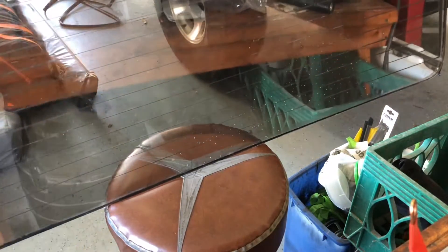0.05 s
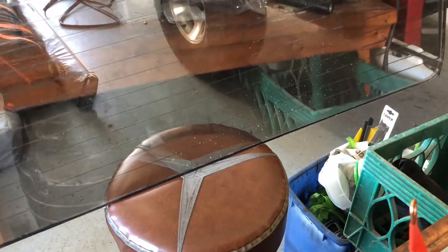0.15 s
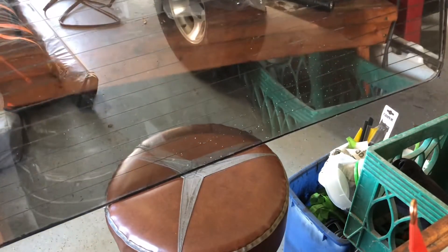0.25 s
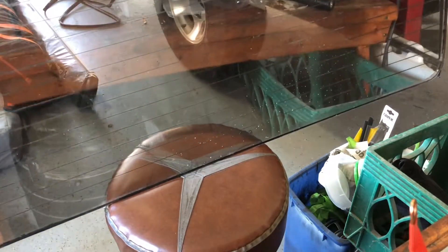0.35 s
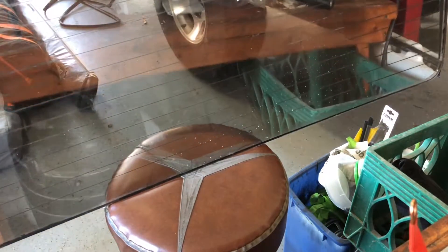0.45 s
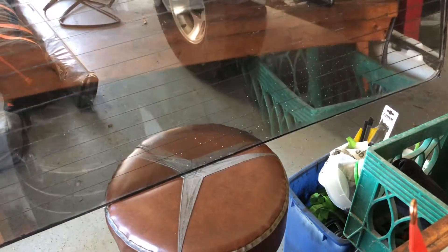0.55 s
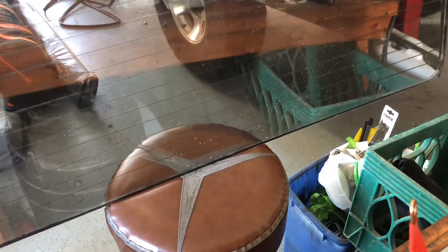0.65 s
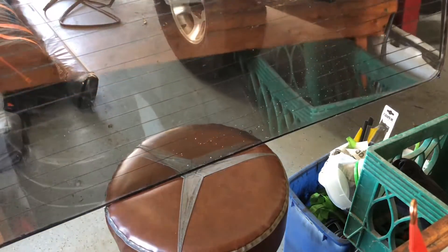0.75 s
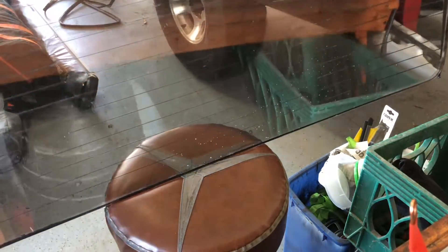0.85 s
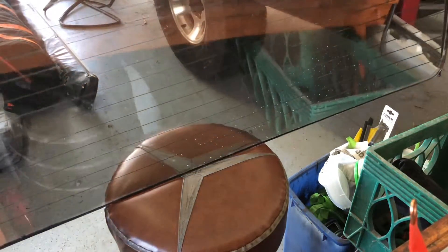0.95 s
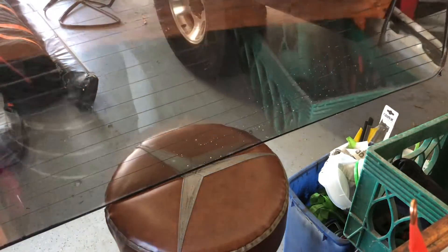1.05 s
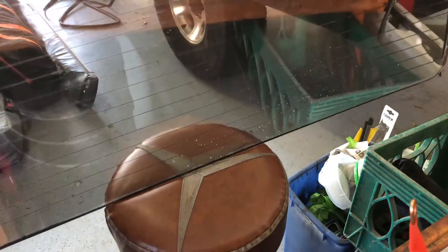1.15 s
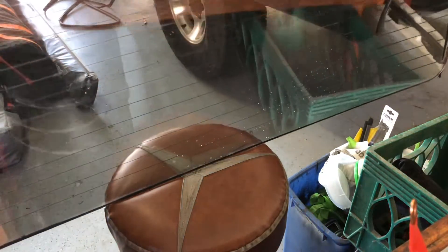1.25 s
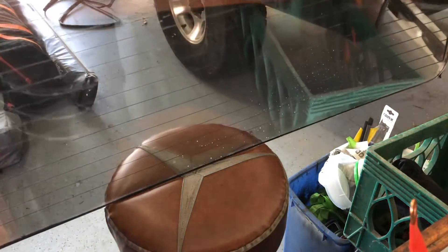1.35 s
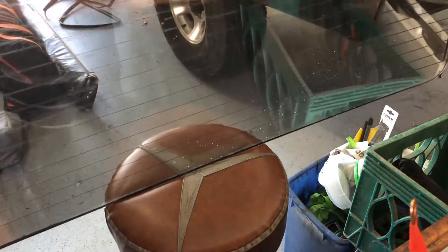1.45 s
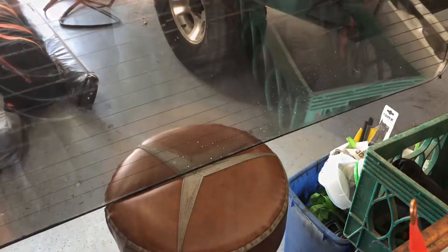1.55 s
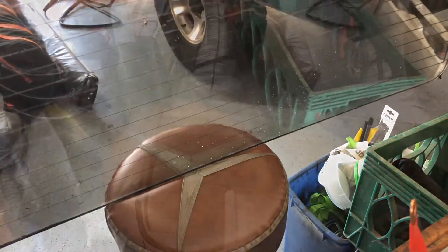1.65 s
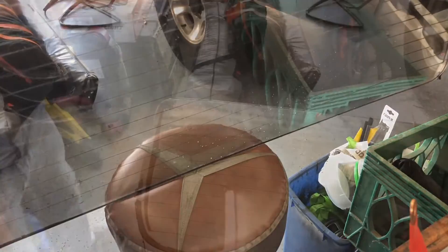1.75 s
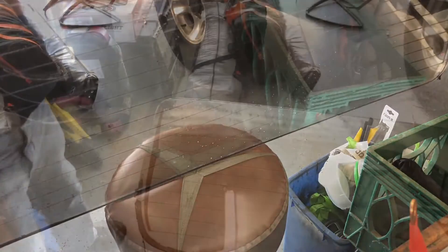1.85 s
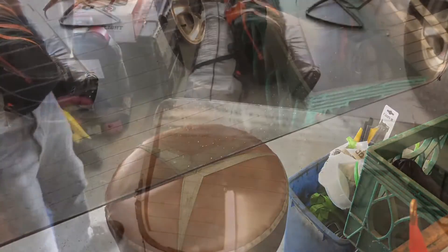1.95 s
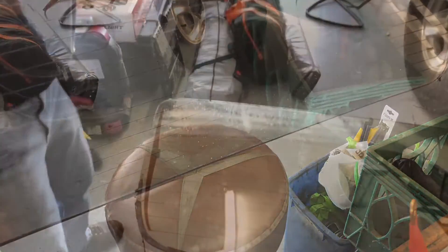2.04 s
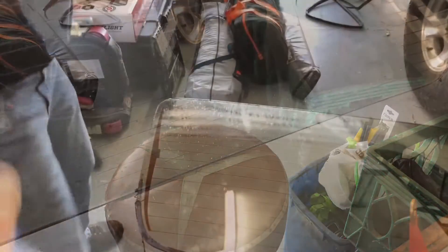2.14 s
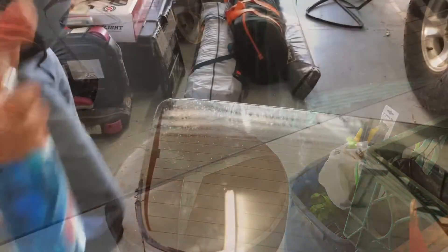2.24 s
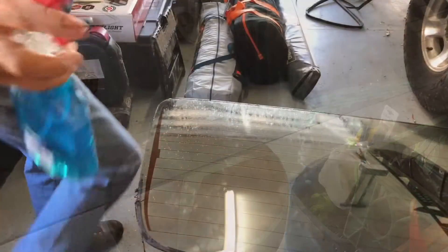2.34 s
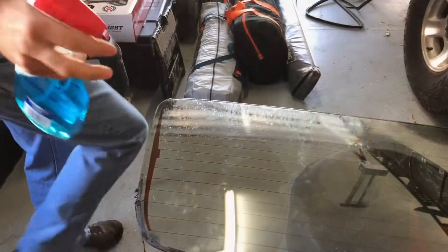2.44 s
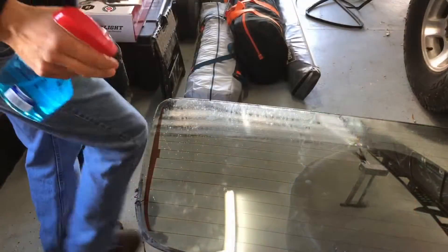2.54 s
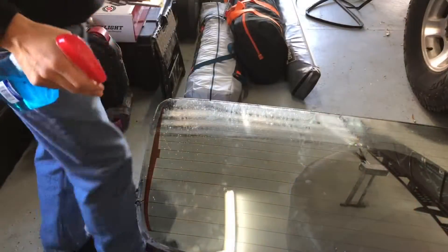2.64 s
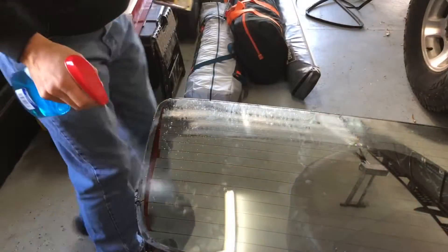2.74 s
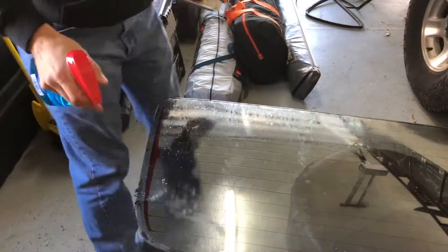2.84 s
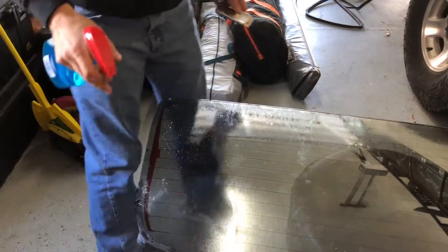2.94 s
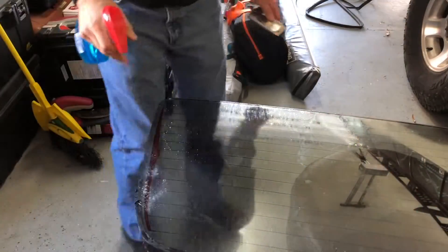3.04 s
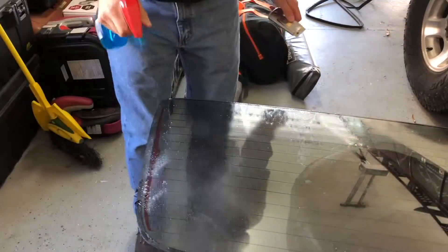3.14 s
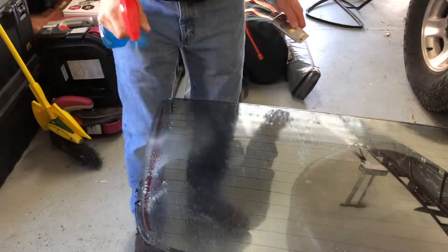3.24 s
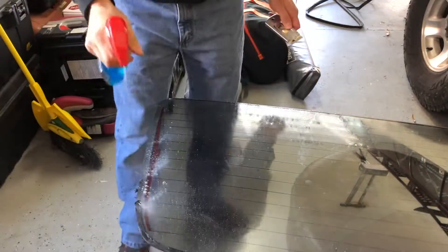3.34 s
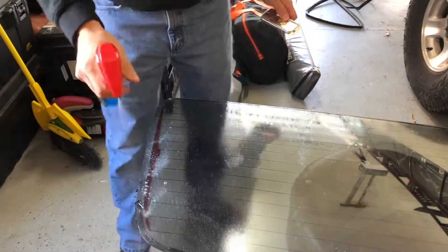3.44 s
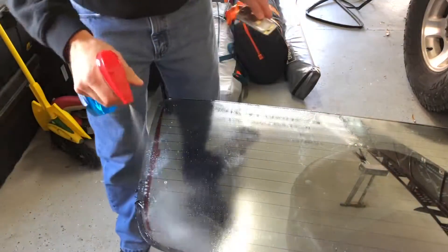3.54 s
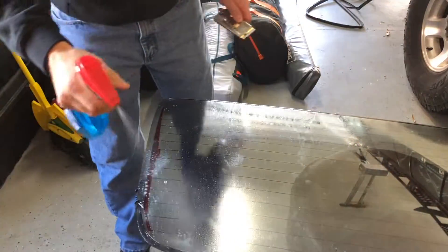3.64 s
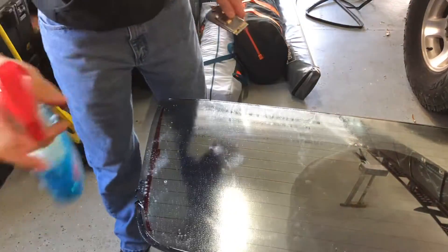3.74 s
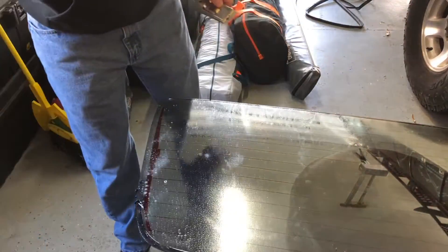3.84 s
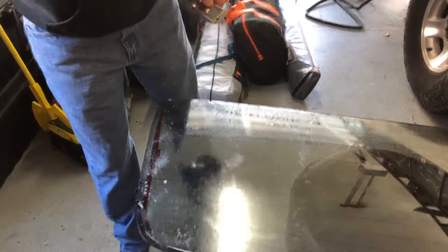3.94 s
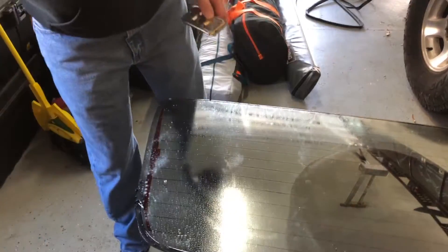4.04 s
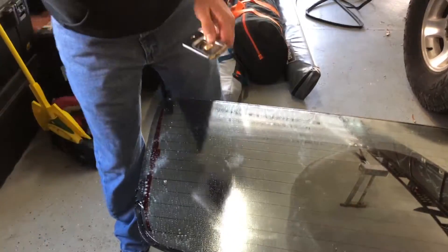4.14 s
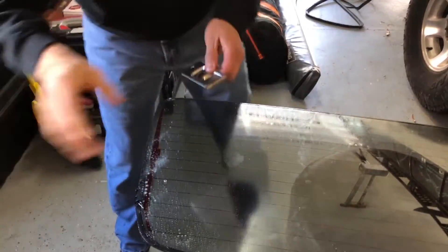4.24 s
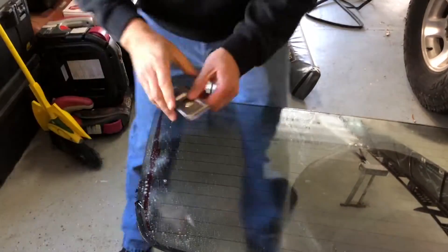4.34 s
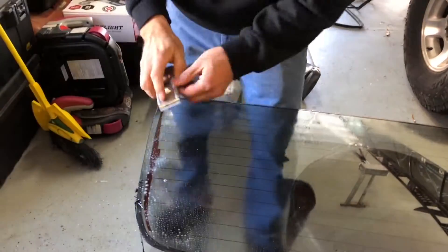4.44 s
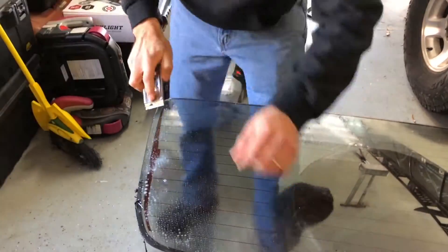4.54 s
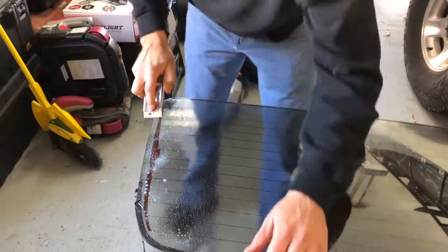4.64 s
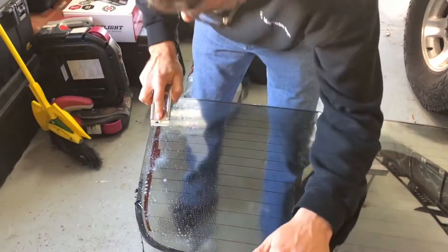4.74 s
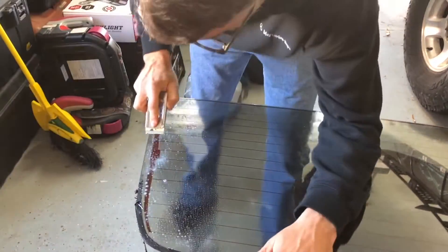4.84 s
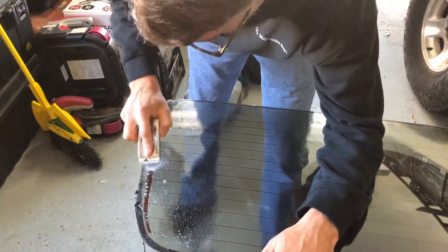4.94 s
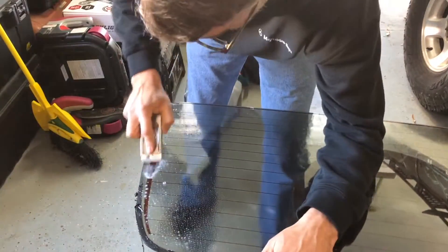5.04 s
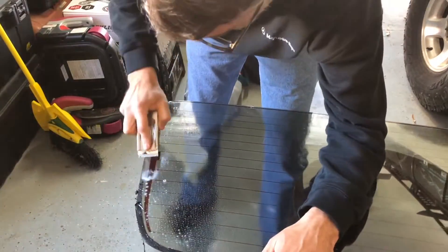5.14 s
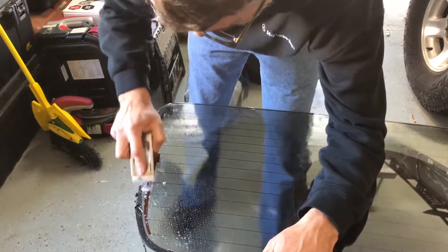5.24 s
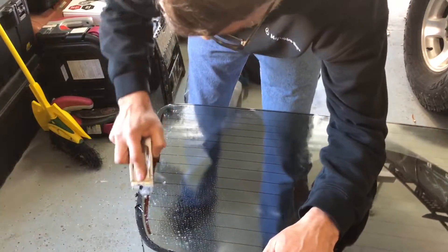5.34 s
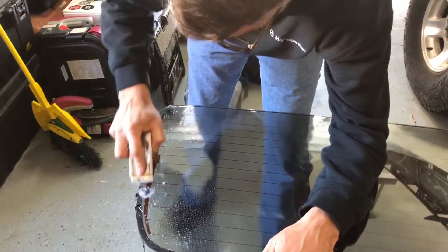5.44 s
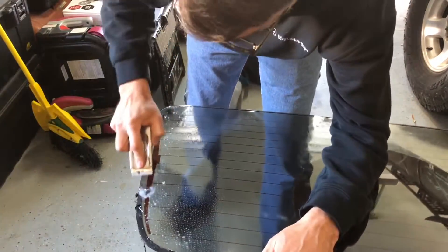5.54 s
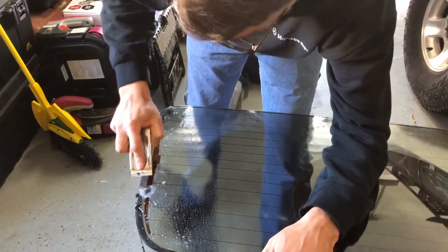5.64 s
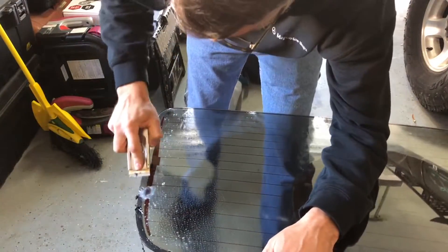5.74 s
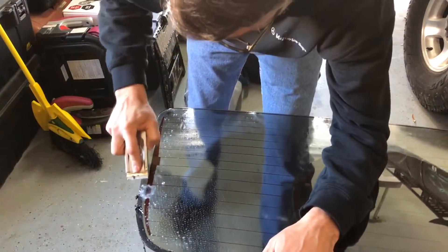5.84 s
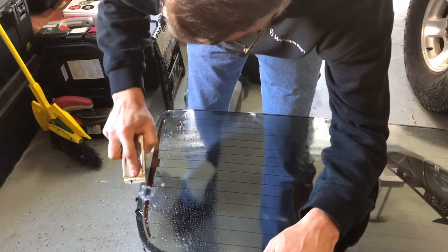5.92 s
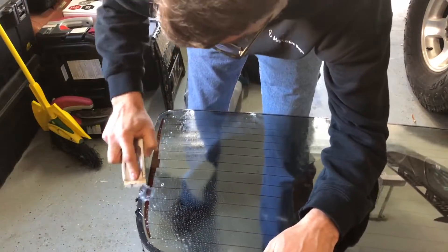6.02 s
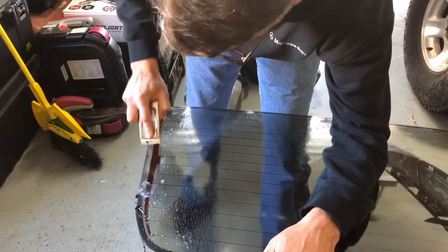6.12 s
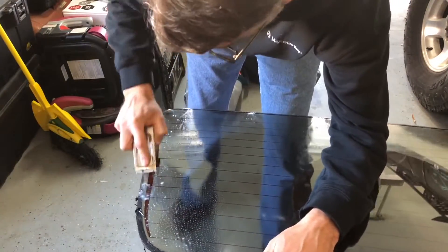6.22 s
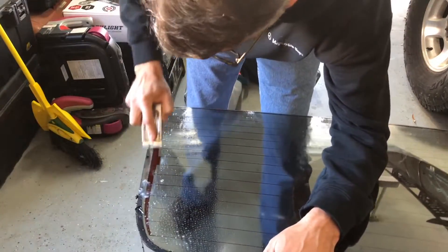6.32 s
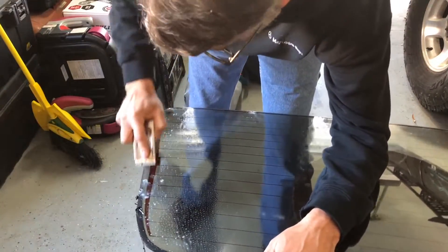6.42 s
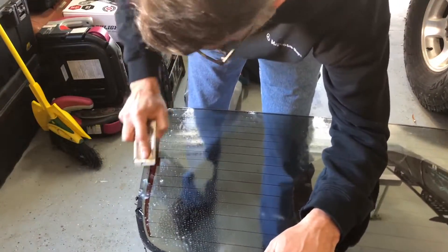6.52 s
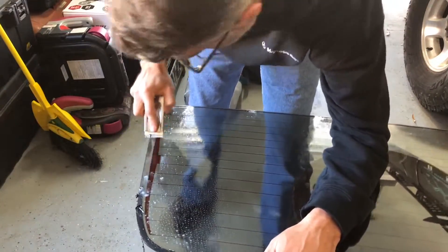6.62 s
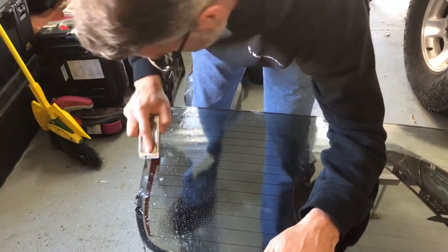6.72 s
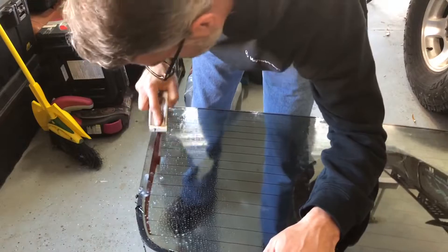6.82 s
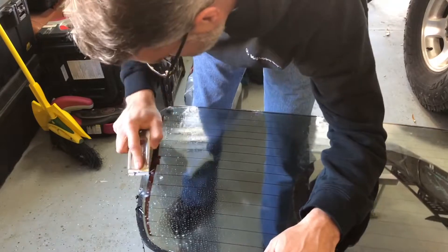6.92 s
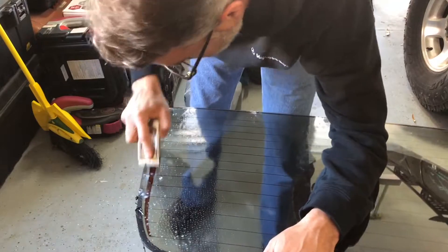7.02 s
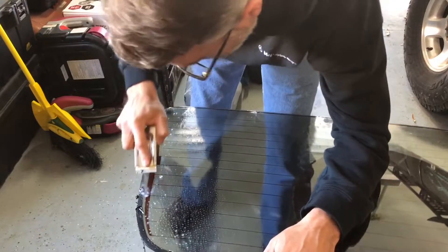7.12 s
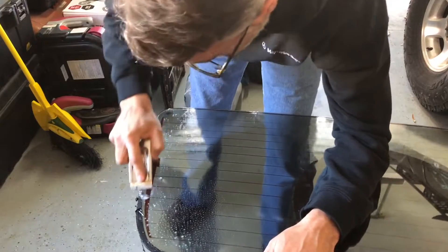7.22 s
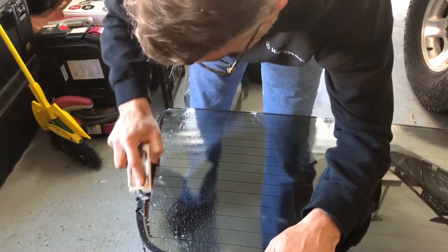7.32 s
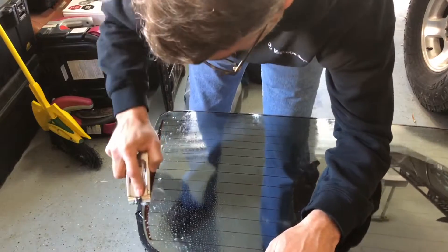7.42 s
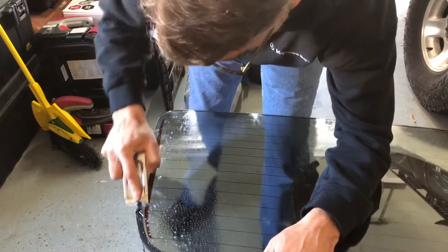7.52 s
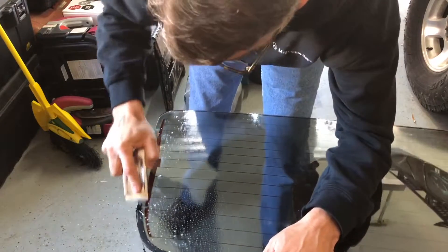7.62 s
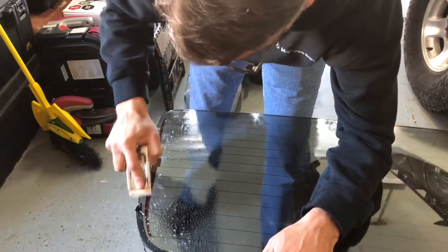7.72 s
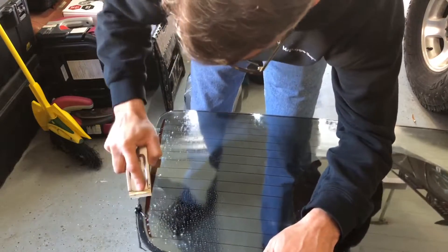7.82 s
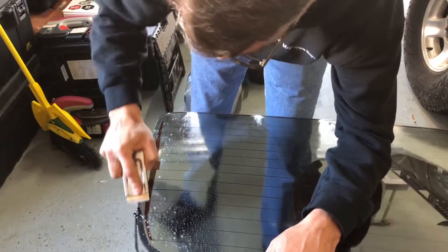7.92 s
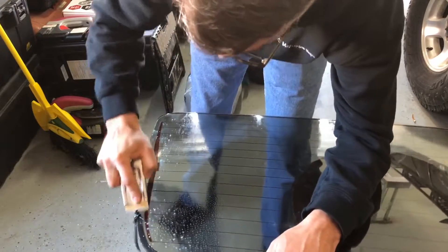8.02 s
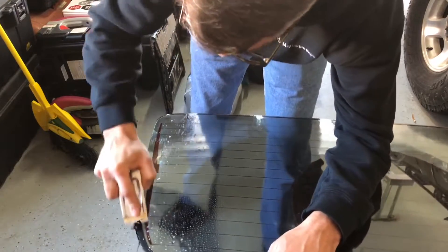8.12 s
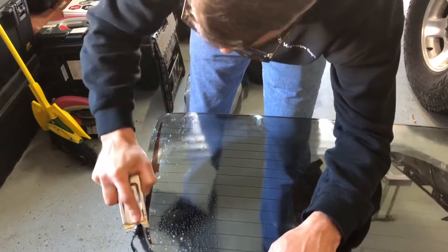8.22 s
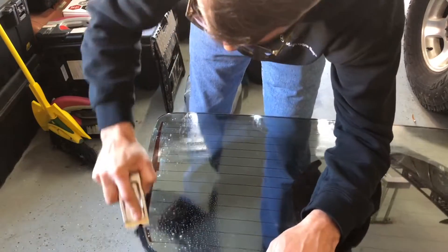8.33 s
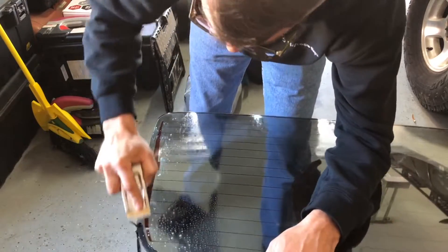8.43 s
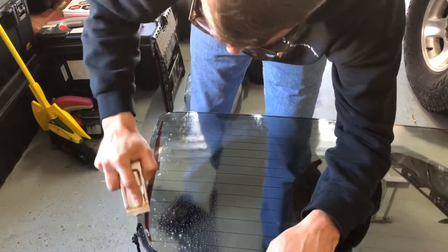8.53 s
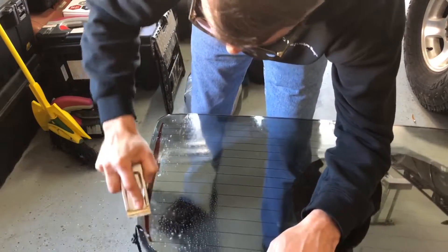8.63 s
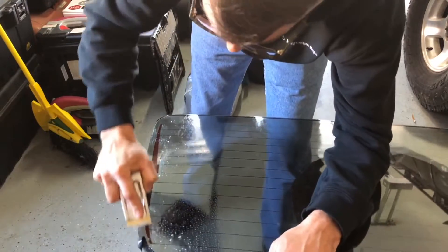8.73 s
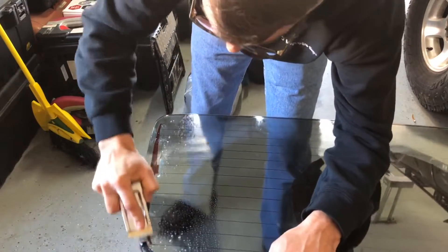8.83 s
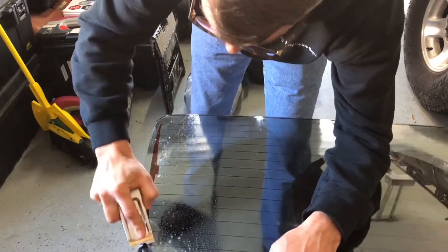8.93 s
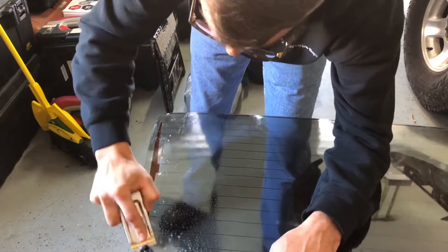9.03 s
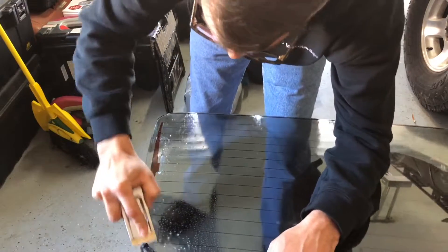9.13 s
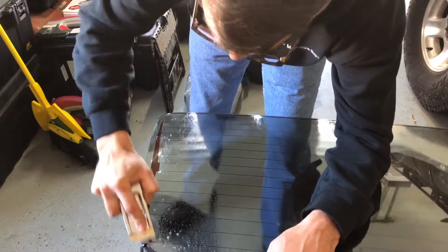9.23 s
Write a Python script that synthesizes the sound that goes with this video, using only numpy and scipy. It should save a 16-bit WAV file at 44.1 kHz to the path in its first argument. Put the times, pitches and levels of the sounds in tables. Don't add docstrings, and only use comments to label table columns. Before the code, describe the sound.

A workshop's low hum and hiss sinks away while cloth and plastic rustle and something small clinks. An abrupt cut brings a quieter garage: eight quick trigger-sprayer squirts, then a plastic bottle lands and rocks on its rim. A razor blade then scrapes wet glass in fast back-and-forth strokes, settling into a steady shuttle with a knock on each push. Close microphone, short dry room tail.

```python
import sys
import numpy as np
from scipy import signal
from scipy.fft import rfft, irfft, next_fast_len
from scipy.io import wavfile
from scipy.ndimage import uniform_filter1d

SR = 44100
rng = np.random.default_rng(int(sys.argv[2]) if len(sys.argv) > 2 else 0)


def master(y):
    cut = np.clip(np.atleast_2d(y).T, -1, 1)
    pcm = np.round(cut * 32767)
    wavfile.write(sys.argv[1], SR, pcm.astype(np.int16))


def convert_level_to_amplitude(level_db):
    exponent = np.asarray(level_db, float) / 20
    return 10 ** exponent


N = 408807
T = np.arange(N) / SR
LOOP = 2 ** 17
CUT_S = 2.683


def evened(x):
    return x / np.sqrt(np.mean(x ** 2) + 1e-20)


def curve(t, points):
    return np.interp(t, *np.transpose(points))


def coloured(x, points):
    size = next_fast_len(len(x))
    f, level_db = np.transpose(points)
    hz = np.fft.rfftfreq(size, 1 / SR)
    gain = convert_level_to_amplitude(np.interp(np.log(hz + 1), np.log(f + 1), level_db))
    return evened(irfft(rfft(x, size) * gain, size)[:len(x)])


def grit(per_s, spread_db, size=N):
    large = np.minimum(rng.exponential(1, size), 4) * (rng.random(size) < per_s / SR)
    return rng.standard_normal(size) * convert_level_to_amplitude(spread_db * large)


def texture(points, per_s=0, spread_db=0):
    return np.resize(coloured(grit(per_s, spread_db, LOOP), points), N)


def drift(t, per_s, spread_db):
    steps = rng.standard_normal(300)
    return np.interp(t * per_s, np.arange(len(steps)), convert_level_to_amplitude(spread_db * steps))


def resonate(x, hz, width):
    r = np.exp(-np.pi * width / SR)
    zeros = (1 - r ** 2) / 2 * np.array([1, 0, -1])
    poles = [1, -(1 + r ** 2) * np.cos(2 * np.pi * hz / SR), r ** 2]
    return signal.lfilter(zeros, poles, x)


def slide(x, hz, width):
    turn = np.exp(2j * np.pi * np.cumsum(hz) / SR)
    r = np.exp(-np.pi * width / SR)
    return 2 * (turn * signal.lfilter([1 - r], [1, -r], x * turn.conj())).real


def flecked(x, fine_db, broad_db):
    z = signal.stft(x, nperseg=512, noverlap=384)[2]
    fine, broad = rng.standard_normal((z.shape[1], z.shape[0], 2)).T
    fine = evened(uniform_filter1d(uniform_filter1d(fine, size=2, axis=0), size=7, axis=1))
    broad = evened(uniform_filter1d(uniform_filter1d(broad, size=20, axis=0), size=10, axis=1))
    z = z * convert_level_to_amplitude(fine_db * fine + broad_db * broad)
    return evened(signal.istft(z, nperseg=512, noverlap=384)[1][:len(x)])


def bumps(s, db, rise, t60):
    out = np.zeros(N)
    for at, gain, up, down in np.broadcast(s, convert_level_to_amplitude(db), rise, t60):
        near = slice(max(int((at - 3 * up) * SR), 0), int((at + down) * SR))
        u = T[near] - at
        out[near] += gain * np.where(u < 0, np.exp(-2 * (u / up) ** 2), convert_level_to_amplitude(-60 * np.maximum(u, 0) / down))
    return out


def bursts(noise, s, db, rise, t60):
    out, u = np.zeros(N), T[:SR // 50] - .003
    shape = np.where(u < 0, np.exp(-2 * (u / rise) ** 2), convert_level_to_amplitude(-60 * np.maximum(u, 0) / t60))
    for at, gain in zip(s, convert_level_to_amplitude(db)):
        start = int((at - .003) * SR)
        burst = shape * noise[start:start + len(u)]
        out[start:start + len(u)] += gain * burst / abs(burst).max()
    return out


def ring(s, db, modes, push, pitch=0.98, vary_db=4.5, detune=0.0033):
    out, t = np.zeros(N + SR), T[:SR // 6]
    hz, mode_db, t60 = np.transpose(modes)[:, :, None]
    for at, gain, k in np.broadcast(s, convert_level_to_amplitude(db), pitch):
        chance = rng.standard_normal((2, len(hz), 1))
        share = convert_level_to_amplitude(mode_db + vary_db * chance[0] - 60 * t / t60)
        sound = (share * np.sin(2 * np.pi * k * hz * (1 + detune * chance[1]) * t)).sum(0)
        blow = rng.standard_normal(len(t)) * convert_level_to_amplitude(-60 * t / push)
        sound = signal.fftconvolve(sound, blow)[:len(t)]
        out[int(at * SR):][:len(t)] += gain * sound / abs(sound).max()
    return out[:N]


# f/Hz, level/dB
HUM_LINES = [(62.4, -51.5), (119.7, -51), (239.7, -63.5)]
# f/Hz, level/dB
RUMBLE = [(15, -59), (25, -21), (54, 2), (123, -1), (140, -0.5), (216, -13.5), (260, -13), (340, -19),
          (570, -120)]
WASH = [(88, -49), (150, -3), (264, -13), (358, -8), (475, -9.5), (789, -7.5), (2500, -26), (3250, -61),
        (5500, -120)]
HISS = [(880, -7), (1500, -5), (2100, -12.5), (2720, -10), (3280, -8), (4160, -11.5), (7030, -6.5),
        (8000, 4), (8830, -9.5), (9470, -8), (10200, -16), (11000, -5.5), (16000, -23)]
# t/s, level/dB
HUM_FADE = [(0, -1), (.9, -1), (1.5, -4.5), (2.03, -10), (2.35, -14.5), (2.6, -20.5)]


def shop():
    fade = convert_level_to_amplitude(curve(T, HUM_FADE))
    second_hiss = convert_level_to_amplitude(-56) * np.clip((T - 2.034) / .06 + .5, 0, 1)
    lines = 0
    for hz, db in HUM_LINES:
        level = convert_level_to_amplitude(db) * drift(T, 8.03, 1.6)
        lines = lines + level * np.sin(2 * np.pi * hz * np.cumsum(drift(T, 4.98, 0.092)) / SR)
    hum = evened(evened(lines) + convert_level_to_amplitude(-4.0) * texture(RUMBLE))
    hiss = texture(HISS, 280, 3.5)
    hiss = np.r_[flecked(hiss[:LOOP], 1.6, 1.3), hiss[LOOP:]]
    whine = 1.1 * resonate(hiss, 3297, 43)
    hiss = (hiss + whine) * drift(T, 7.9, 0.82)
    sound = convert_level_to_amplitude(-45.5) * fade * hum + convert_level_to_amplitude(-59) * texture(WASH) + np.hypot(convert_level_to_amplitude(-56) * fade, second_hiss) * hiss
    return sound * np.clip((CUT_S - T) / 0.00091, 0, 1)


# t/s, peak level/dB, swell/s, fade/s, centre f/Hz
RUSTLES = [(.07, -49, 0.013, 0.033, 8000), (.23, -57.5, 0.039, 0.079, 4500), (.62, -54, 0.037, 0.043, 5000),
           (0.887, -46.5, 0.0024, 0.023, 430), (.933, -48.5, 0.0011, 0.0055, 4000),
           (1.004, -48, 0.019, 0.14, 4450), (1.025, -51, 0.014, 0.05, 7750),
           (1.27, -51.5, 0.045, 0.084, 9900), (.89, -50.5, .006, 0.011, 6500), (.785, -56, .01, .02, 8000),
           (1.983, -48, 0.0032, 0.011, 7000), (1.995, -47.5, 0.004, 0.013, 3500),
           (2.098, -50, 0.00085, 0.0026, 6000), (2.127, -50, 0.0018, .006, 1500),
           (2.166, -46.5, .0012, 0.0045, 2500), (2.041, -49, .002, 0.0092, 10000),
           (2.051, -34.5, 0.0018, 0.0081, 6900), (2.098, -51, 0.033, 0.035, 6000),
           (2.054, -40.5, 0.001, 0.0065, 1500), (2.165, -49, 0.021, 0.019, 5000),
           (2.27, -52, 0.053, 0.13, 4080), (2.85, -54, 0.022, 0.074, 12100),
           (4.545, -52.5, 0.016, 0.085, 11800), (4.813, -58, 0.001, 0.0036, 10000)]
# peak level/dB, f/Hz, swell/s, t60/s
FOOTFALL = (-33.5, 84, .022, .3)
# f/Hz, level/dB, t60/s
CLINK_MODES = [(2240, 8, 0.045), (2400, 5, 0.041), (3400, -3, 0.075), (5540, 2, 0.058), (4190, -9, 0.024),
               (6170, -4, .1), (3200, -4, 0.23)]


def rustles():
    noise = .5 * texture(HISS, 900, 2.0) + 0.8 * texture([(1500, -2.5), (16000, -3.0)], 1100, 2.5)
    noise = np.resize(flecked(noise[:LOOP], 3.5, 2.5), N)
    out = np.zeros(N)
    for s, db, rise, t60, hz in RUSTLES:
        near = slice(max(int((s - .15) * SR), 0), int((s + 1.5) * SR))
        band = resonate(resonate(noise[near], hz, 2.0 * hz), hz, 2.0 * hz)
        out[near] += bumps(s, db, rise, 2.94 * t60)[near] * evened(band)
    step_s = 2.143
    db, hz, rise, t60 = FOOTFALL
    sag = 1 - 1.24 * np.clip(T - step_s, -rise, t60 / 2)
    turn = 2 * np.pi * hz * (T - step_s) * sag
    step = 0.47 * np.cos(turn) + 0.577 * np.cos(1.8 * turn) + 0.32 * texture(RUMBLE)
    out += bumps(step_s, db, rise, t60) * step + bumps(step_s, -49.5, 0.027, 0.13) * texture(WASH)
    return out + ring(1.001, -39.0, CLINK_MODES, 0.037, 1, 1.7)


# f/Hz, level/dB
QUIET_FLOOR = [(30, -48), (60, -23.5), (109, -1), (174, -5), (245, -4.5), (526, -15), (866, -11.5),
               (2120, -17), (3500, -19), (4500, -76)]
# t/s, f/Hz, level/dB
DRONE = [
    (4.14, 109.4, -75.5),
    (4.666, 106.1, -69.5),
    (5.05, 112.3, -88),
]
STILL = (3.84, 4.1, 4.4, 4.5)


def quiet():
    s, hz, db = np.transpose(DRONE)
    turn = 2 * np.pi * np.cumsum(np.interp(T, s, hz)) / SR
    buzz = np.interp(T, [4.25, 4.4, 4.55], [.3, .6, .12])
    partials = np.sin(turn) + buzz * (np.sin(2 * turn) + 1.05 * np.sin(3 * turn))
    drone = np.sqrt(2) * convert_level_to_amplitude(np.interp(T, s, db, -120, -120)) * partials
    air = texture([(2500, -28), (3500, -3.5), (5900, -7.0), (6750, -2.0), (7600, -9.0), (9000, -7.0),
                   (13500, -6.5), (15000, -9.0), (16000, -2.5)])
    air_db = -71 - 4.5 * np.interp(T, STILL, [0, 1, 1, 0])
    floor = convert_level_to_amplitude(-70.5) * texture(QUIET_FLOOR) + convert_level_to_amplitude(air_db) * air
    return floor * drift(T, 13, 0.51) * np.clip((T - CUT_S) / 0.004, 0, 1) + drone


# t/s, peak level/dB, hollow part relative level/dB
SNAPS = [(2.9015, -39, -8), (2.9177, -18, -24), (3.03, -15, -30), (3.143, -24, -15), (3.2645, -23, -15),
         (3.371, -34, -8), (3.3825, -22, -23), (3.4909, -19, -30), (3.5924, -22, -23), (3.6928, -26, -17),
         (3.7992, -34, -17), (3.8038, -21, -25)]
# first t/s, last t/s, level/dB
MIST_PULLS = [
    (2.92, 2.964, -49),
    (3.035, 3.099, -45.5),
    (3.162, 3.204, -42),
    (3.285, 3.325, -40.5),
    (3.4, 3.411, -45.5),
    (3.509, 3.518, -47.5),
    (3.612, 3.613, -41),
    (3.711, 3.72, -40.5),
]
# t/s, peak level/dB
SPITS = [(2.9259, -29), (2.9312, -35), (2.936, -34), (2.9421, -28), (2.952, -35), (3.0375, -34),
         (3.0544, -31), (3.0585, -29), (3.0641, -28), (3.0722, -27), (3.0791, -27), (3.0874, -26),
         (3.0953, -31), (3.1035, -35), (3.1106, -30), (3.1243, -37), (3.1398, -32), (3.1638, -27),
         (3.1703, -23), (3.179, -23), (3.1882, -25), (3.1982, -28), (3.2072, -26), (3.2166, -34),
         (3.2259, -32), (3.2603, -32), (3.2888, -32), (3.2958, -31), (3.3039, -30), (3.3129, -28),
         (3.3216, -30), (3.3302, -30), (3.3369, -32), (3.3451, -34), (3.3765, -32), (3.4009, -32),
         (3.4048, -37), (3.4755, -46), (3.5076, -34), (3.512, -32), (3.516, -31), (3.5197, -30),
         (3.5788, -47), (3.6054, -36), (3.6096, -32), (3.6147, -28), (3.6198, -32), (3.6765, -47),
         (3.7027, -34), (3.7075, -32), (3.7123, -28), (3.7179, -26), (3.7236, -32), (3.7284, -29),
         (3.79, -45), (3.985, -52)]
# f/Hz, level/dB
SPIT = [(300, -38), (600, -28), (2700, -28.5), (5000, -19.5), (8200, -15.5), (10800, -5), (12800, -5),
        (15000, -4.5)]
MIST = [(180, -42), (300, -6.5), (788, -11), (1230, -4), (2140, -13), (3020, -14), (5800, -4), (8190, -6),
        (15000, 3.5)]
HOLLOW = [(180, -41), (300, -19), (779, -6), (1720, -10), (3740, -11), (4870, -15.5), (6440, -6.5),
          (8260, -23), (10000, -21), (13000, -33), (22000, -120)]
# f/Hz, width/Hz, level/dB
NOZZLE = [(700, 100, 10.5), (2400, 460, 12), (4500, 270, -11)]


def spray():
    s, db, hollow_db = np.transpose(SNAPS)
    spit, mist = texture(SPIT), texture(MIST, 1800, 3)
    chamber = sum(convert_level_to_amplitude(gain_db) * resonate(mist, hz, width) for hz, width, gain_db in NOZZLE)
    mist = evened(mist + chamber)
    out = bursts(spit, s + 0.00088, db - 2, 0.00033, 0.004)
    out += spit * bumps(s + 0.0013, db - 21.0, 0.0028, 0.045)
    out += texture(HOLLOW) * bumps(s + 0.0015, db + hollow_db - 3.5, 0.0014, 0.037)
    at, spit_db = np.transpose(SPITS)
    out += bursts(spit, at, spit_db + 1, .0007, .005)
    for first, last, mist_db in MIST_PULLS:
        out += mist * bumps(last, mist_db - 0.5, 1.36 * (last - first), 0.15)
    return out + gulps()


# t/s, peak level/dB, f/Hz, t60/s
GULPS = [
    (2.922, -48, 425, 0.056),
    (3.035, -53, 398, 0.043),
    (3.19, -58, 420, .05),
    (3.46, -53, 240, 0.036),
    (3.52, -46, 700, 0.032),
]


def gulps():
    out, t = np.zeros(N), T[:SR // 10]
    sag_per_s = 6.5
    for s, db, hz, t60 in GULPS:
        tone = np.sin(2 * np.pi * hz * t * (1 - sag_per_s * t / 2))
        out[int(s * SR):][:len(t)] += convert_level_to_amplitude(db - 60 * t / t60) * np.minimum(t / 0.0038, 1) * tone
    return out


# t/s, peak level/dB
LANDINGS = [
    (4.013, -34),
    (4.028, -38),
]
# f/Hz, level/dB, t60/s
BOTTLE_MODES = [(584, -13, 0.094), (820, 8, 0.061), (950, 7, 0.022), (1090, -33, 0.035), (1410, -4, 0.012),
                (327, -8, 0.081), (650, -11, 0.021)]
BENCH_MODES = [(197, 12.5, 0.089), (109, 2, 0.14), (70, -5, 0.32), (276, 1, 0.056)]
# t/s, peak level/dB, pitch f/Hz
RIM = [(4.192, -55, 700), (4.198, -45, 820), (4.279, -43.5, 970), (4.367, -44.5, 950), (4.431, -46, 1000),
       (4.493, -48.5, 800), (4.538, -49.5, 820), (4.578, -50, 774), (4.617, -54, 740), (4.654, -50.5, 625),
       (4.671, -47.5, 610), (4.687, -50, 870), (4.711, -52, 684)]
# f/Hz, level/dB, t60/s
RIM_MODES = [(1000, 2, 0.033), (1180, -13, 0.022), (700, 0.5, 0.022), (1500, -21, 0.019),
             (2090, -24, 0.017), (2940, -16, 0.013)]


def bottle():
    s, db = np.transpose(LANDINGS)
    tick = texture(HOLLOW) * bumps(s + 0.00074, db + 2 - 10.0, 0.00098, 0.025)
    tick += texture(SPIT) * bumps(s + 0.00077, -49.0, 0.0013, 0.027)
    at, rim_db, hz = np.transpose(RIM)
    rim_cut = signal.butter(2, 420, "high", fs=SR, output="sos")
    rock = signal.sosfilt(rim_cut, ring(at - .001, rim_db, RIM_MODES, .018, hz / 1000, 2.5, .03))
    scuff = texture([(300, -30), (900, 6), (2500, -13), (4000, -14.0), (6000, -51)])
    rock += scuff * bumps(at + 0.0017, rim_db - 15.5, 0.0018, 0.054)
    landing = ring(s, db + 3.5, BOTTLE_MODES, 0.038, 1.0, 10.0, 0.053)
    return landing + ring(s + 0.00344, -35.0, BENCH_MODES, 0.024) + tick + rock


# turn t/s, fastest t/s, level/dB
FREE_STROKES = [(4.885, 4.9, -82), (4.942, 4.986, -61.5), (5.019, 5.01, -64), (5.044, 5.09, -56),
                (5.1, 5.148, -52.5), (5.178, 5.232, -47.5), (5.244, 5.275, -44.5), (5.328, 5.362, -48),
                (5.384, 5.425, -44), (5.445, 5.487, -50), (5.505, 5.536, -45.5), (5.57, 5.6, -45),
                (5.628, 5.656, -45), (5.686, 5.716, -49.5), (5.74, 5.775, -51.5), (5.798, 5.826, -53.5),
                (5.85, 5.884, -52.5), (5.9, 5.923, -62), (5.95, 5.976, -63.5), (6.003, 6.02, -72.5),
                (6.049, 6.062, -60.5), (6.103, 6.128, -51), (6.213, 6.188, -45), (6.219, 6.243, -41.5),
                (6.283, 6.283, -47), (6.31, 6.372, -44.5), (6.393, 6.406, -47), (6.438, 6.458, -50),
                (6.474, 6.541, -44), (6.564, 6.59, -57), (6.636, 6.683, -48), (6.724, 6.777, -46.5),
                (6.802, 6.833, -49.5), (6.893, 6.996, -48), (7.015, 7.051, -43), (7.088, 7.102, -46.5),
                (7.137, 7.133, -47.5), (7.165, 7.2, -50.5), (7.222, 7.245, -49)]
# knock t/s, stroke level/dB, pane level/dB, crack relative level/dB
PUSHES = [(7.273, -47, -43, 0), (7.383, -46, -40.5, 10), (7.489, -45.5, -40.5, 18.5),
          (7.609, -44, -40, 13.5), (7.724, -45.5, -40, 10), (7.836, -45, -40, 15.5), (7.952, -45, -39.5, 3),
          (8.069, -43.5, -41, 1), (8.183, -45, -40, 9), (8.297, -46, -39, 12), (8.415, -46.5, -39, 6),
          (8.532, -48.5, -38.5, 3), (8.646, -49.5, -38, 12), (8.758, -49.5, -37.5, 11.5),
          (8.872, -51.5, -37, 10), (8.987, -49.5, -36.5, 1.5), (9.099, -48.5, -38, 6.5),
          (9.218, -50.5, -36.5, 7)]
# t/s, level/dB
GRIP = [(5.4, -1), (5.75, 1), (5.9, 5), (6.03, 6), (6.06, 12), (6.135, 13), (6.15, -8.5)]


def strokes():
    knock, push_db = np.transpose(PUSHES)[:2]
    turn, top, db = np.transpose(FREE_STROKES)
    push_s = .034
    free = np.c_[turn, top, np.r_[turn[1:], knock[0] - push_s], db]
    push = np.c_[knock - push_s, knock - .008, knock + .016, push_db]
    back = np.c_[knock + .026, knock + .053, knock + .074, push_db - 4.5]
    free[:, 2] += 0.0029 * (top > GRIP[-2][0])
    return np.r_[free, push, back[:-1]]


# f/Hz, level/dB
FIZZ = [(880, -65), (1500, -10), (2140, -40), (2210, -23), (2970, -7.5), (4160, -2), (6300, 1.5),
        (7210, -1.5), (15000, -1)]
# f/Hz, width/Hz, level/dB
BLADE = [(5020, 280, -3), (5880, 65, -8), (6390, 150, -1.5), (7660, 87, -1), (8970, 210, 3.5)]
# f/Hz, level/dB, t60/s
PANE_MODES = [(572, -1, .06), (686, 2, .26), (825, -2, .12), (1000, -5, .12), (1218, -9, .27),
              (1474, -8, .1), (1700, -4, .17), (2090, 2, .07), (2290, -2, .25), (2640, -6, .18),
              (3010, -8, .2), (3275, 1, .05), (400, -14, .06)]
# t/s, level/dB
LOOSE = [(4.91, 7), (4.98, -0.5), (5.15, -5.5), (5.62, -3.5), (5.86, 1), (5.93, 8.5), (6.02, 12),
         (6.09, 5.5), (6.15, -7), (7.25, -2.5), (7.32, 0.5), (7.7, 2.5), (9.2, -1.5)]
# t/s, level/dB
FREE_PANE = [(5.1, -8), (5.2, -1.5), (6.3, 1), (6.45, -2.5)]
# t/s, peak level/dB
NICKS = [
    (5.155, -37),
    (5.3, -36),
    (5.3964, -27),
    (5.433, -24),
    (5.88, -16.5),
    (6.2353, -30),
    (6.2453, -28),
    (6.782, -31),
    (8.272, -36),
]


def scrape():
    work = slice(int(4.8 * SR), N)
    speed, ringing, t, out = np.zeros(N), np.zeros(N), T[work], np.zeros(N)
    for start, top, end, db in strokes():
        near = slice(int((start - .08) * SR), int((end + .12) * SR))
        reach = abs(np.where(T[near] < top, top - start, end - top)) + 0.00086
        u = np.abs(T[near] - top) / reach
        shape = convert_level_to_amplitude(db - 22.5 * u ** 3.1)
        speed[near] += shape ** 2
        ringing[near] += (shape * convert_level_to_amplitude(curve(top, LOOSE))) ** 2
    grains = grit(2500, 2.6, len(t))
    flutter, fleck, broken = (45, 3.8), (3.3, 1.8), (14, 3.5)
    hz, width, db = BLADE[0]
    lowest = evened(slide(resonate(grains, hz, 2 * width), hz * drift(t, 30, .13), width))
    blade = [lowest * drift(t, 54, 4.8) * convert_level_to_amplitude(db + curve(t, GRIP))]
    for hz, width, db in BLADE[1:]:
        tone = evened(slide(grains, hz * drift(t, 25, 0.058), width))
        blade.append(convert_level_to_amplitude(db) * drift(t, *flutter) * tone)
    blade[3:] = convert_level_to_amplitude(-8 * (t > GRIP[-1][0])) * blade[3:]
    pane = 0
    for hz, db, _ in PANE_MODES:
        tone = evened(resonate(resonate(grains, hz, 29), hz, 110))
        pane = pane + convert_level_to_amplitude(db) * drift(t, *broken) * tone
    pane = evened(pane)
    fizz = coloured(grains, FIZZ)
    squeal = sum(drift(t, 40, 4.6) * resonate(fizz, hz, 110) for hz in (9900, 10570, 11450, 12700, 14400, 14700))
    high = coloured(fizz + 0.25 * squeal, [(6300, -40), (8500, -4.5), (9800, 0), (16000, 0.5)])
    high = flecked(high, *fleck)
    wander = sum(drift(t, *flutter) * slide(grains, hz * drift(t, 19, 0.35), 250) for hz in (3050, 5600, 6700))
    low = evened(sum(blade)) + convert_level_to_amplitude(-0.5) * coloured(fizz, [(8500, 2), (9800, -39)])
    low = evened(low + convert_level_to_amplitude(-41.0) * pane + convert_level_to_amplitude(-12.0) * evened(wander))
    low = flecked(low, *fleck)
    s, db = np.transpose(NICKS)
    nicks = bumps(s + 0.001, db - 20, 0.00075, 0.014)
    out[work] = np.sqrt(speed[work]) * high + (np.sqrt(ringing) + nicks)[work] * low
    lasting = np.sqrt(abs(uniform_filter1d(ringing[work], size=3500)))
    out[work] += convert_level_to_amplitude(-14.5 + curve(t, FREE_PANE)) * lasting * pane
    return out


# t/s, pane level/dB, crack relative level/dB
BRUSHES = [
    (5.149, -55.5, 14.5),
    (5.309, -46.5, -24),
    (5.429, -40.5, 0),
    (5.545, -43.5, 7),
    (5.667, -45, -11),
    (5.78, -56, -10),
    (5.885, -59.5, -10),
    (6.088, -50, -24),
]
# f/Hz, level/dB
CRACK = [(150, -62), (250, -24.5), (629, -8.5), (1490, -18.5), (3340, -10), (3990, -15.5), (5340, -4.5),
         (8270, -16.5), (8970, -11), (10500, -14.5), (15600, -52), (22000, -120)]
# f/Hz, level/dB, t60/s
HOLDER_MODES = [(3350, -3.5, 0.095), (4694, 5, 0.11), (5000, -2, 0.028), (5560, 8, 0.091),
                (5430, -19, 0.108), (6200, -8, 0.054), (6150, -2, 0.044), (7250, 8, .05), (8450, -8, .04),
                (9700, -14, .04)]
# f/Hz, level/dB, t60/s
MIDDLE_MODES = [(390, 0, .06), (560, 4, .08), (715, 4, .08), (900, -3, .06), (1210, -6, .2),
                (1450, -5, .08), (1670, -4, .12), (2093, -2, .06), (2320, -5, .1)]
# f/Hz, width/Hz, share
MUTED = (880, 1200, 0.69)


def knocks():
    s, db, crack_db = np.r_[BRUSHES, np.delete(PUSHES, 1, axis=1)].T
    early = s < PUSHES[0][0]
    thump_db = np.where(early, -25, -16.5)
    crunch = coloured(grit(1300, 2.8, LOOP), CRACK)
    low = np.resize(coloured(crunch, [(2500, -13.5), (4000, -23.5)]), N)
    high = np.resize(coloured(crunch, [(2500, -28), (3300, -14)]), N)
    crack = high * bumps(s + 0.00053, db + crack_db - 11.5, 0.00071, 0.0049)
    crack += low * bumps(s + 0.0011, db - 10.0, 0.00056, 0.2)
    crack += high * bumps(s + 0.0052, db + crack_db - 11, 0.0036, 0.0077)
    crack += ring(s, db + crack_db - 10.5, HOLDER_MODES, 0.015, 1.0, 3.8, 0.0059)
    crack += ring(s[early], db[early] + 1.5, MIDDLE_MODES, 0.031, 0.99, 2.5)
    pane = ring(s[~early], db[~early] + 2.3, PANE_MODES, 0.0062, 0.97, 0.8, 0.0047)
    hz, width, share = MUTED
    pane = pane - share * (T > FREE_STROKES[-1][0]) * resonate(pane, hz, width)
    return crack + pane + flex(s + .002, db + thump_db + 8)


# f/Hz, level/dB, t60/s
FLEX_MODES = [(178.5, 1, .2), (187.5, 1, .2), (297, -11, .15), (306, -13, .15), (150, -15, .15),
              (361, -20, .15), (115, -22, .1)]


def flex(s, db):
    out, t = np.zeros(N + SR), T[:SR // 5]
    hz, mode_db, t60 = np.transpose(FLEX_MODES)[:, :, None]
    swell = 1 - np.exp(-(t / .012) ** 2)
    for at, gain, k in zip(s, convert_level_to_amplitude(db), 1 + 0.015 * rng.standard_normal(len(s))):
        sound = (convert_level_to_amplitude(mode_db - 60 * t / t60) * np.sin(2 * np.pi * k * hz * t)).sum(0)
        out[int(at * SR):][:len(t)] += gain * swell * sound
    return out[:N]


def room(x, t60=0.22):
    t = T[:SR // 2]
    tail = signal.lfilter([1], [1, -.3], rng.standard_normal(len(t))) * convert_level_to_amplitude(-60 * t / t60) * (t > .006)
    return signal.fftconvolve(x, tail / np.linalg.norm(tail))[:N]


# f/Hz, width/Hz, level/dB
MIC_PORT = (15600, 400, 3.5)


def scene():
    near = spray() + bottle() + scrape() + knocks()
    low_cut = signal.butter(3, 95, "high", fs=SR, output="sos")
    near = signal.sosfilt(low_cut, near + convert_level_to_amplitude(-10.5) * room(near)) + quiet()
    hz, width, db = MIC_PORT
    mix = shop() + rustles() + near + convert_level_to_amplitude(db) * resonate(near, hz, width)
    return np.array([mix, mix])


def band_limit(x):
    return signal.sosfilt(signal.butter(12, 17090, fs=SR, output="sos"), x)


def record(dry):
    edge = signal.firwin(255, 15900, window=("kaiser", 8), fs=SR)
    mix = signal.oaconvolve(dry, edge[None], "same")
    return band_limit(mix)


dry = scene()
out = record(dry)
master(out)
```